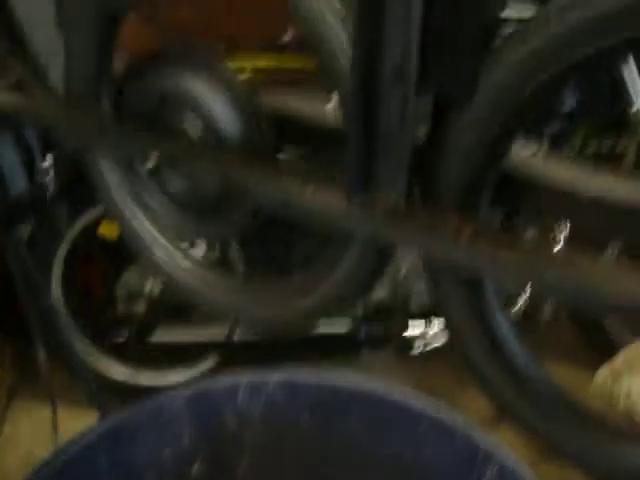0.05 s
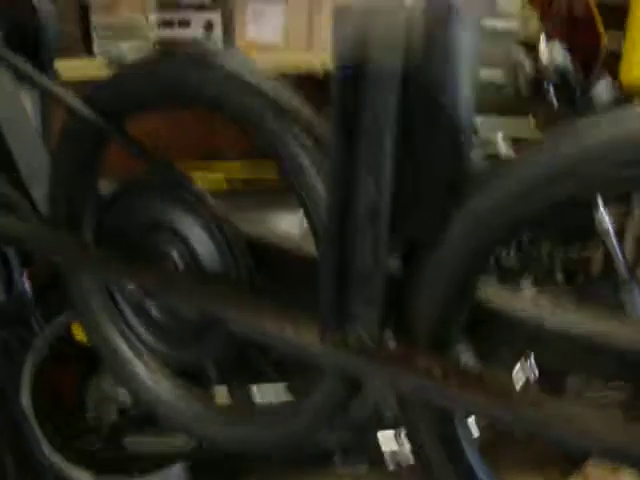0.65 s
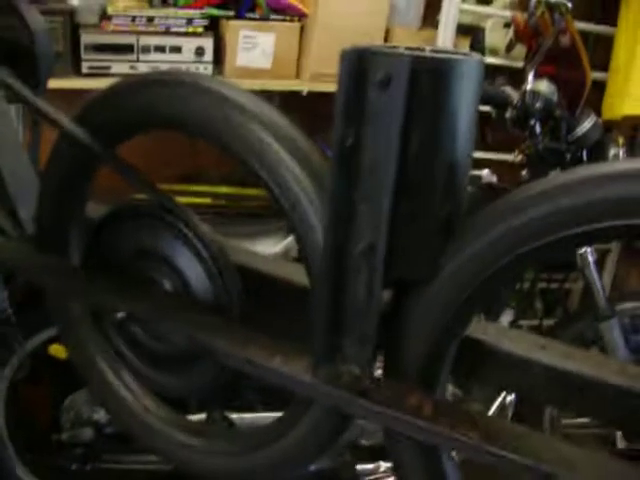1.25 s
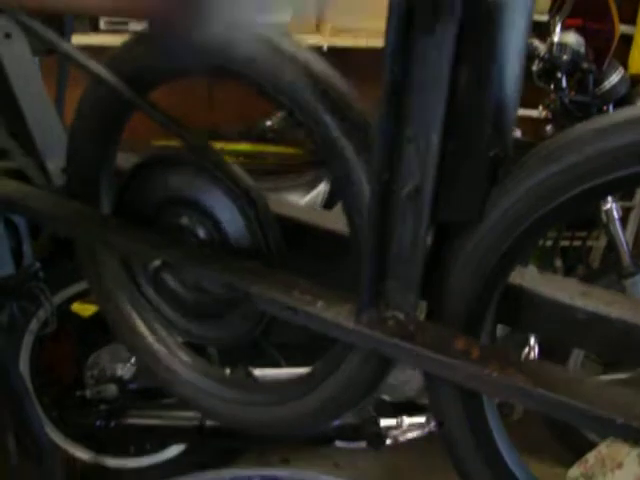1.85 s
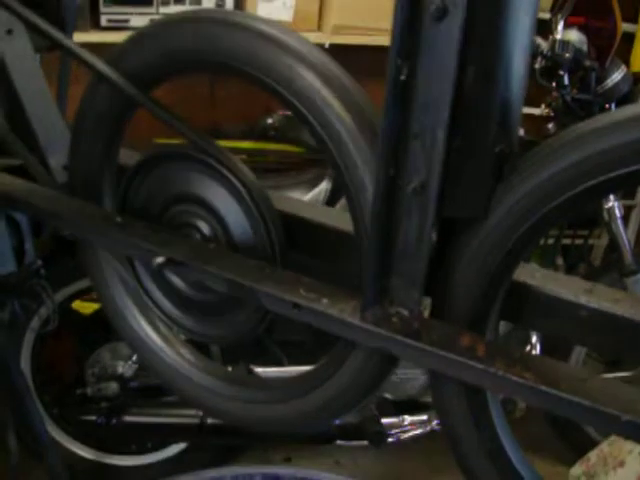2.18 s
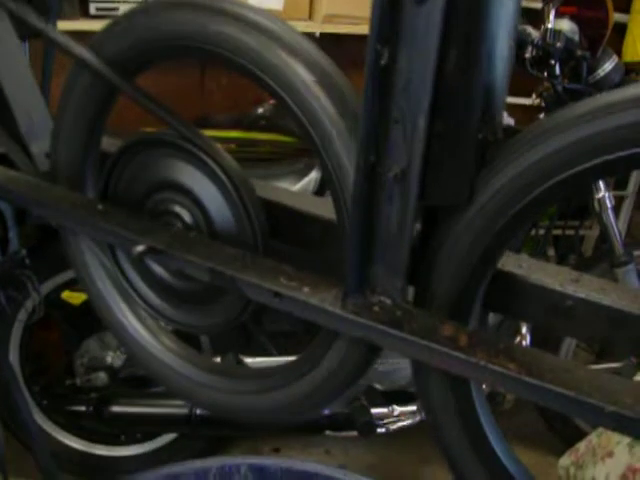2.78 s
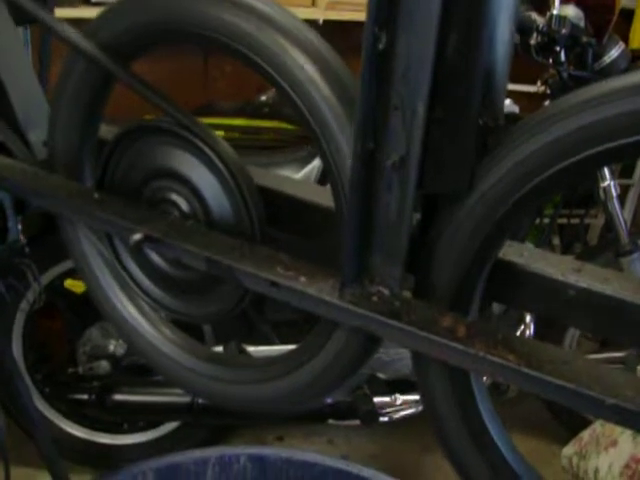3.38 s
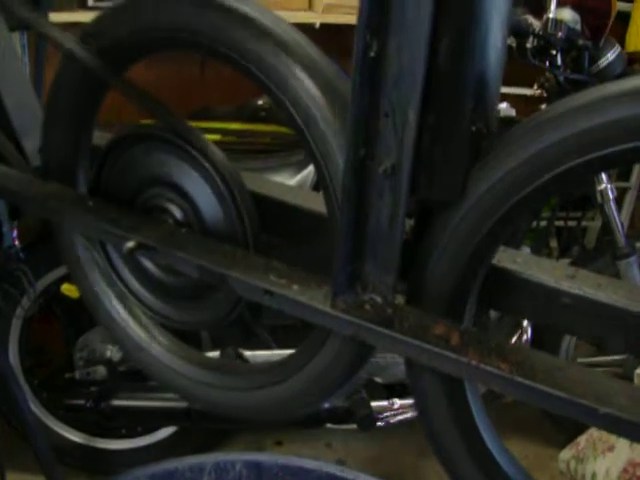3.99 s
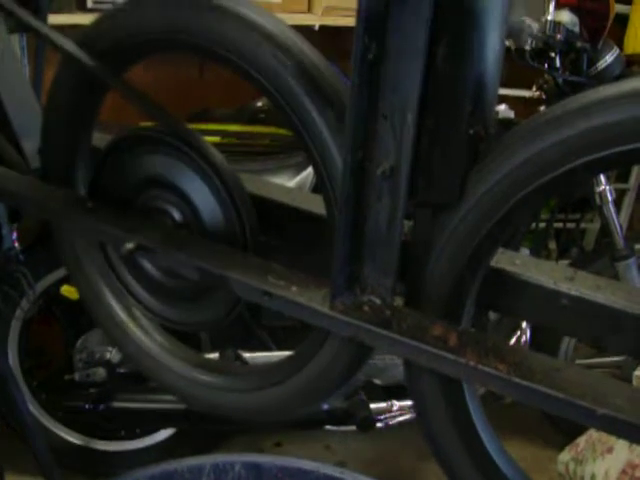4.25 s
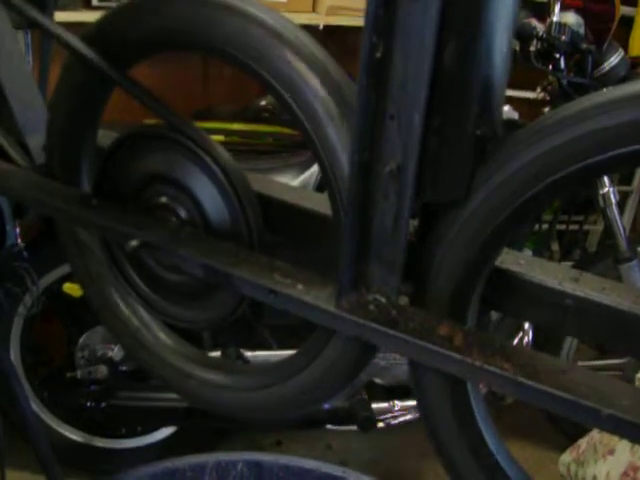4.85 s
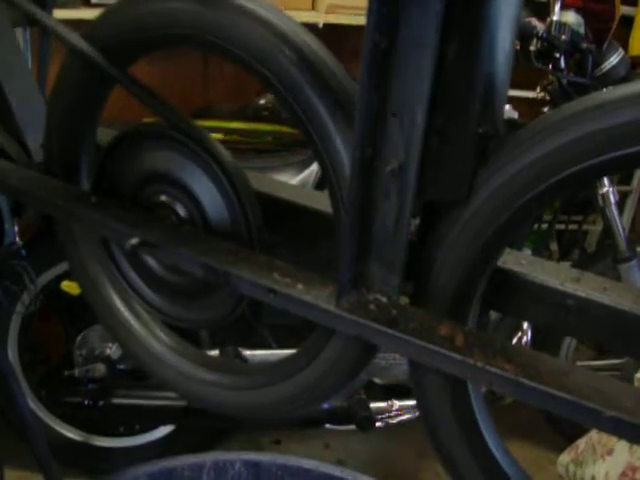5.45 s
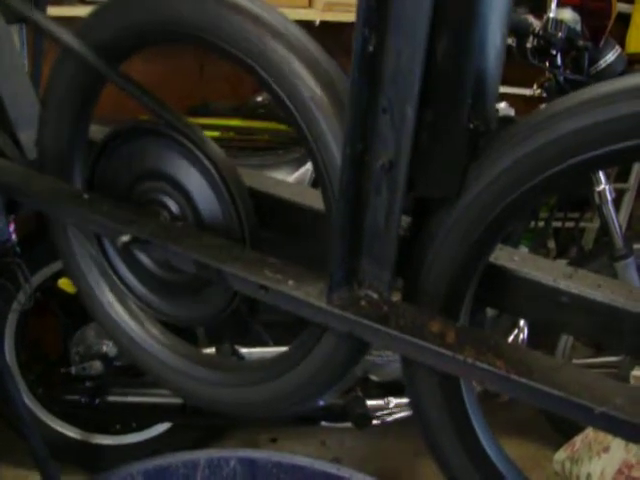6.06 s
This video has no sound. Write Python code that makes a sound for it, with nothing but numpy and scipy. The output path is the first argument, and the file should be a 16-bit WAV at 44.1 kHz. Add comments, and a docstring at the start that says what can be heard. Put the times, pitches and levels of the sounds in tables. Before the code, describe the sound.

A belt-driven can crusher runs throughout with a ticking rumble and a steady motor hum. From the start, rubber tyres scrub on a can in a slightly howling roar, cut off by a thump at 0.7 seconds. Aluminium cans hop in the steel feed tube with hollow knocks and crackles until about 2.4 seconds, with another short roar ending at 1.5. A longer roar swells and breaks off at 3 and again at 3.3, when a flattened can rings thinly and thuds into a plastic bin. The next roar peaks around 4.2, followed by a bin thud and clatter until 4.7. Two shorter roars end near 5.1 and 5.8, each with a thump and a thin clank, and a last knock and clank come at 6.1. The workshop has little echo, and the small, close, dull microphone overloads on the loudest peaks.

```python
"""A rising roar of rubber scrubbing on a can, cut off by a thump: a can crusher runs in a workshop.
Two belt-driven tyres spin under a steel feed tube, over the rumble and hum of their drive.
Cans hop and clatter in the tube, then scrub against the tyres until they are snatched through.
Some flattened cans ring thinly; some thud into a plastic bin.
A small, dull microphone close by overloads on the loudest peaks."""
import sys
import numpy as np
from scipy import signal
from scipy.fft import rfft, irfft, next_fast_len
from scipy.io import wavfile
from scipy.ndimage import map_coordinates

SR = 44100
rng = np.random.default_rng(int(sys.argv[2]) if len(sys.argv) > 2 else 0)


def master_out(mix):
    """Clip the mix to full scale and print it as 16-bit PCM to the path in sys.argv[1]."""
    frames = np.transpose(np.atleast_2d(mix))
    ceiling = np.clip(frames, -1, 1)
    pcm = np.round(ceiling * 32767).astype(np.int16)
    wavfile.write(sys.argv[1], SR, pcm)


N = 273861


def amp(db):
    """Decibels to gain."""
    return 10 ** (np.asarray(db) / 20)


def unit(x):
    """Scale to rms 1."""
    return x / np.sqrt(np.mean(x ** 2) + 1e-20)


def along(points, hz):
    """Read a curve of (frequency, value) points on a log frequency axis."""
    freqs, values = np.transpose(points)
    return np.interp(np.log(hz + 1), np.log(freqs + 1), values)


def wobble(rate):
    """Smooth random modulation, rate knots a second."""
    knots = rng.standard_normal(int(N * rate / SR) + 4)
    return map_coordinates(knots, [np.arange(N) * rate / SR])


def add(track, start, sound):
    """Mix a sound into the track at start seconds."""
    part = track[max(round(start * SR), 0):][:len(sound)]
    part += sound[:len(part)]


def coloured(x, spectrum, peaks=()):
    """Minimum-phase EQ: a broad curve with resonances on top."""
    size = 2 * next_fast_len(len(x) // 2 + 4096)
    hz = np.fft.rfftfreq(size, 1 / SR)
    boost_db = sum(lift / (1 + (2 * (hz - centre) / width) ** 2) for centre, width, lift in peaks)
    cepstrum = irfft(np.log(amp(along(spectrum, hz) + boost_db)))
    cepstrum[1:size // 2] *= 2
    cepstrum[size // 2 + 1:] = 0
    return irfft(rfft(x, size) * np.exp(rfft(cepstrum)))[:len(x)]


def slips(rate, spread_db):
    """Tiny random clicks of uneven size, rate a second."""
    clicks = (rng.random(N) < rate / SR) * rng.choice([-1, 1], N)
    return unit(clicks * amp(spread_db * rng.standard_normal(N)))


def struck(blows, modes, focus_db, attack_s, flutter):
    """A blow rings the modes, focus_db less per octave from its centre; tumbling makes them flutter."""
    track, t = np.zeros(N), np.arange(SR // 3) / SR
    for start, db, centre_hz in blows:
        for hz, mode_db, t60 in modes:
            strength_db = db + mode_db - focus_db * abs(np.log2(hz / centre_hz)) + rng.normal(0, 2.2)
            envelope = amp(strength_db - 60 * t / t60) * (1 - np.exp(-t / attack_s))
            drift = flutter * np.cumsum(rng.standard_normal(len(t))) / np.sqrt(SR)
            add(track, start, envelope * np.sin(2 * np.pi * hz * t + drift))
    return track


# reverb decay of the room: (frequency [Hz], t60 [s])
ROOM_DECAY = [(200, 0.092), (1000, 0.27), (5000, 0.34)]
def workshop(send):
    """A cluttered room answers with a short, diffuse tail after 8 ms of pre-delay."""
    hz, t, noise = signal.stft(rng.standard_normal(SR // 2), SR, nperseg=256)
    tail = signal.istft(noise * amp(-60 * t / along(ROOM_DECAY, hz)[:, None]), SR, nperseg=256)[1]
    return signal.fftconvolve(np.pad(send, (SR // 125, 0)), tail / np.linalg.norm(tail))[:N]


# EQ of the running belt and wheels: (frequency [Hz], relative level [dB])
RUMBLE_EQ = [(25, -35.5), (80, -19), (200, -18), (380, -4), (600, -1.5), (820, 1.5), (1050, 3.5),
             (1300, -8), (1900, -15.5), (2500, -3.5), (3300, -17.5), (3800, -20.5), (5400, -27.5)]
def belt_rumble():
    """Belt and wheels lay down a rumbling, ticking bed."""
    running = rng.standard_normal(N) + 0.63 * slips(rate=320, spread_db=4.5)
    return amp(-31.5 + 0.62 * wobble(12)) * unit(coloured(running, RUMBLE_EQ))


# tones of the motor and belt: (frequency [Hz], rms level [dB])
MOTOR_TONES = [(120, -58.5), (196, -52.5), (392, -46.5), (786, -37), (1120, -44.5)]
def motor_hum():
    """Motor and belt hum, each tone a little unsteady in level and pitch."""
    hum, t = np.zeros(N), np.arange(N) / SR
    for hz, db in MOTOR_TONES:
        gain = amp(db + 2.4 * wobble(5)) * np.sqrt(2)
        hum += gain * np.sin(2 * np.pi * hz * t + 0.81 * wobble(13))
    return hum


# cans landing in the bin: (time [s], relative level [dB], centre of the blow [Hz])
BIN_HITS = [(1.745, -26, 197), (3.315, -14, 242), (3.36, -25, 175), (4.36, -16.5, 189)]
# modes of the bin's wall: (frequency [Hz], relative level [dB], t60 [s])
BIN_MODES = [(167, -5, 0.22), (210, 1.5, 0.36), (226, -3.5, 0.057)]
def bin_thuds():
    """A flattened can lands and the plastic wall gives a low, soft-edged thud."""
    return amp(-1) * struck(BIN_HITS, BIN_MODES, focus_db=12, attack_s=0.004, flutter=12)


# clanks of flattened cans: (time [s], relative level [dB], centre of the blow [Hz])
CLANK_HITS = [(3.288, -23, 3570), (5.121, -21.5, 3580), (5.179, -25.5, 3770), (5.842, -20, 5330),
              (6.132, -16.5, 2100)]
# modes of the thin metal: (frequency [Hz], relative level [dB], t60 [s])
METAL_MODES = [(1707, -2, .25), (1670, -1.5, 0.56), (2240, 0, 0.19), (2720, -11, 0.53), (3320, 0, 0.11),
               (3600, -1.5, 0.24), (3640, -5.5, 0.26), (4180, -7, 0.086), (4640, -1.5, 0.13),
               (5000, -9.5, .12), (5040, -0.5, 0.14), (5800, -6, 0.035)]
def clanks():
    """A blow sets a flattened can ringing, thin and bright."""
    return amp(-2) * struck(CLANK_HITS, METAL_MODES, focus_db=9, attack_s=0.001, flutter=30)


# hard knocks of a can in the tube:
# (time [s], relative body level [dB], relative crackle level [dB], contact length [s])
HARD_KNOCKS = [(0.663, -12.5, -19, 0.046), (0.791, -13, -17, 0.012), (0.947, -22, -33, 0.006),
               (0.972, -21, -28.5, 0.019), (1.067, -7, -21, 0.0024), (1.128, -11.5, -26, 0.008),
               (1.171, -13.5, -35, 0.012), (1.203, -11.5, -38, 0.002), (1.531, -4.5, -37, 0.0028),
               (1.589, -11.5, -24, 0.0052), (1.606, -8.5, -17.5, 0.014), (1.694, -18, -23.5, 0.011),
               (1.736, -12, -17, 0.014), (2.003, -16.5, -27, 0.016), (2.105, -16, -19, 0.0058),
               (2.184, -15.5, -23, 0.006), (2.227, -18, -20, 0.013), (2.322, -14.5, -20, 0.0093),
               (3.281, -22, -21, 0.014), (4.259, -10, -15.5, 0.026), (4.361, -10, -16.5, 0.014),
               (4.415, -16.5, -19.5, 0.0048), (4.542, -20.5, -26.5, 0.0067), (4.578, -13, -24.5, 0.0069),
               (4.621, -13, -27, 0.0035), (5.313, -23, -50, 0.0021), (6.127, -12, -25, 0.0086)]
# a loose can tumbling on the tyres: (start [s], end [s], relative brushing level [dB])
TUMBLES = [(0.791, 1.04, -24.5), (1.101, 1.334, -21.5), (1.639, 2.0, -24.5), (2.018, 2.42, -21),
           (4.29, 4.72, -23)]
def hops(rebound_s=0.016, rebound_db=-9, taps_per_s=12, tap_length_s=0.007):
    """Cue list like HARD_KNOCKS: each knock, its one bounce, and the chance taps of a tumbling can."""
    cues = list(HARD_KNOCKS)
    for start, body_db, crackle_db, length in HARD_KNOCKS:
        cues.append((start + rebound_s, body_db + rebound_db, crackle_db + rebound_db, length))
    for start, end, db in TUMBLES:
        for slot in np.arange(start, end, 1 / taps_per_s):
            body_db, crackle_db = db + 1.5 * rng.standard_normal(2) + [3, -7.5]
            cues.append((slot + rng.random() / taps_per_s, body_db, crackle_db, tap_length_s))
    return cues


def contact(length, t60, snap, spectrum):
    """A can hits: a first snap, then a fading run of small buckles. Longer contacts carry more energy."""
    t = np.arange(SR // 6) / SR
    fade_db = -3 * np.minimum(t / length, 1) - 60 * np.maximum(t - length, 0) / t60
    buckles = rng.choice([-1, 1], len(t)) * amp(0.95 * rng.standard_normal(len(t)) + fade_db)
    force = buckles / np.linalg.norm(buckles)
    force[0] += snap / (1 + (length / 0.0047) ** 2)  # short contacts are one clean blow
    sound = coloured(force, spectrum)
    return sound / np.linalg.norm(sound) * np.sqrt((length + 0.0025) * SR)


# hollow EQ of a can against the tube: (frequency [Hz], relative level [dB])
HOLLOW_EQ = [(30, -32), (150, -24.5), (400, -8), (620, -11), (780, 1), (880, 1.5), (980, -10.5), (1100, -6),
             (1500, -25.5), (2000, -25.5), (2550, -29.5), (3200, -48), (5000, -47)]
# bright EQ of buckling aluminium: (frequency [Hz], relative level [dB])
CRACKLE_EQ = [(300, -22), (1200, -6), (1800, -6), (2300, -1), (2700, 0), (3200, -5.5), (3700, -5),
              (4400, -8.5), (5500, -12), (6200, -19), (7500, -50)]
def clatter():
    """Every hop gives two layers: a hollow knock and a crackle of thin aluminium."""
    body, crackle = np.zeros(N), np.zeros(N)
    for start, body_db, crackle_db, length in hops():
        add(body, start, amp(body_db) * contact(length, t60=0.03, snap=3, spectrum=HOLLOW_EQ))
        add(crackle, start, amp(crackle_db) * contact(length, t60=0.055, snap=0.2, spectrum=CRACKLE_EQ))
    return amp(-3.5) * body, amp(0.15) * crackle


# hollow resonances heard on each hard knock: (frequency [Hz], relative level [dB], t60 [s])
HOLLOW_MODES = [(837, -1, 0.07), (2600, -13, 0.07)]
def hollow_pops():
    """Each hard knock rings with a short, hollow, pitched pop."""
    blows = [(start, body_db, HOLLOW_MODES[0][0]) for start, body_db, _, _ in HARD_KNOCKS]
    return struck(blows, HOLLOW_MODES, focus_db=0, attack_s=0.0018, flutter=26)


# the tyres grip a can and snatch it through: (snatch time [s], lead-in [s], swell [dB/s],
# relative grip ceiling [dB], relative thump level [dB])
SNATCHES = [(0.657, 1.2, 38, -10, -18), (1.504, 0.39, 42, -12.5, -23), (3.024, 1.077, 24.5, -11, -24),
            (3.284, 0.55, 35.5, -10.5, -24), (4.182, 1.165, 34.5, -11, -22),
            (4.269, 0.48, 38, -16.5, -16.5), (5.116, 0.51, 39.5, -10.5, -20),
            (5.84, 0.54, 43.5, -11, -19.5), (6.129, 0.16, 42, -19.5, -24)]
def grip(touch_db=-27.5, drop_db=6, release_db_per_s=112.5, tumble_fade_db_per_s=202):
    """Rubbing envelope in dB: it swells, then drops at the snatch. The hardest-pressing can sets it."""
    t = np.arange(N) / SR
    envelopes = []
    for snatch, lead_in, swell, ceiling_db, _ in SNATCHES:
        held_s = np.minimum(t, snatch) - snatch + lead_in
        bite_db = np.minimum(touch_db + swell * held_s, ceiling_db)
        release_db = (t > snatch) * (drop_db + release_db_per_s * (t - snatch))
        envelopes.append(bite_db - release_db)
    for start, end, db in TUMBLES:
        envelopes.append(db - tumble_fade_db_per_s * np.abs(t - np.clip(t, start, end)))
    return np.max(envelopes, axis=0) + 0.5 * wobble(8)


def thumps():
    """One low push of air as the tyres close on each snatch."""
    track, t = np.zeros(N), np.arange(SR // 8) / SR
    fast = t / 0.00088
    slow = fast / 5
    push = fast * np.exp(1 - fast) - 0.38 * slow * np.exp(1 - slow)
    for snatch, _, _, _, db in SNATCHES:
        add(track, snatch - 0.002, amp(db + 2.5) * push)
    return track


# EQ of rubber rubbing on a can: (frequency [Hz], relative level [dB])
RUBBER_EQ = [(25, -27.5), (85, -27.5), (135, -8), (200, -9.5), (290, -1), (720, -1.5), (1030, -4),
             (1170, -11), (1500, -10), (1900, -13.5), (2450, -8.5), (3200, -20), (4200, -24.5), (5400, -27)]
# resonances of the tube with a can in it: (frequency [Hz], width [Hz], boost [dB])
TUBE_PEAKS = [(128, 20, -1.5), (335, 23, 0.5), (637, 90, 3), (810, 37, 4.5), (905, 67, 7), (984.3, 98, 11),
              (1289.6, 34, 12.5), (1423, 100, 7.5), (3490, 40, 5.5)]
def scrub(howl_hz=985):
    """Rubber sticks and slips on the can, which chatters and roars through the tube."""
    t = np.arange(N) / SR
    grip_db = grip()
    friction = 0.56 * slips(rate=2500, spread_db=0.27) + 0.88 * rng.standard_normal(N)
    roar = unit(coloured(friction * amp(1.25 * wobble(70)), RUBBER_EQ, TUBE_PEAKS))
    # the can bounces against the tube in short, hollow bursts
    bounces = slips(rate=1500, spread_db=1) * amp(3.4 * wobble(40))
    chatter = unit(coloured(bounces, HOLLOW_EQ))
    # the harder the grip, the more the strongest resonance sings, never quite on one pitch
    waver, throb_db = 2.2 * wobble(26), 3.2 * wobble(22)
    howl = amp(1.29 * grip_db + throb_db) * np.sin(2 * np.pi * howl_hz * t + waver)
    return amp(grip_db) * (amp(-1.02) * roar + amp(-8) * chatter) + amp(-5.5) * howl


def scene():
    """Mono mix of machine and cans; only the hollow and metal layers feed the reverb."""
    body, crackle = clatter()
    hollow = body + hollow_pops()
    metal = crackle + clanks()
    thuds = bin_thuds()
    room = workshop(amp(-6.5) * hollow + amp(-8.5) * metal)
    bed = room + belt_rumble() + motor_hum()
    return (bed + thuds + metal + hollow + thumps() + scrub())[None]


# treble roll-off of the small microphone: (frequency [Hz], gain [dB])
MIC_EQ = [(5200, 0), (5600, -4), (5900, -12), (6150, -25), (6400, -50), (6800, -85)]
def record(dry):
    """A dull microphone clips the loudest peaks; a low-pass trims the top of the distortion."""
    ceiling, knee_hardness, top_hz = 0.72, 26, 15800
    size = next_fast_len(N + SR // 2)
    hz = np.fft.rfftfreq(size, 1 / SR)
    dull = irfft(rfft(dry, size) * amp(along(MIC_EQ, hz)), size)
    clipped = dull / (1 + np.abs(dull / ceiling) ** knee_hardness) ** (1 / knee_hardness)
    return irfft(rfft(clipped) * (hz < top_hz), size)[:, :N]


dry = scene()
out = record(dry)
master_out(out)
```